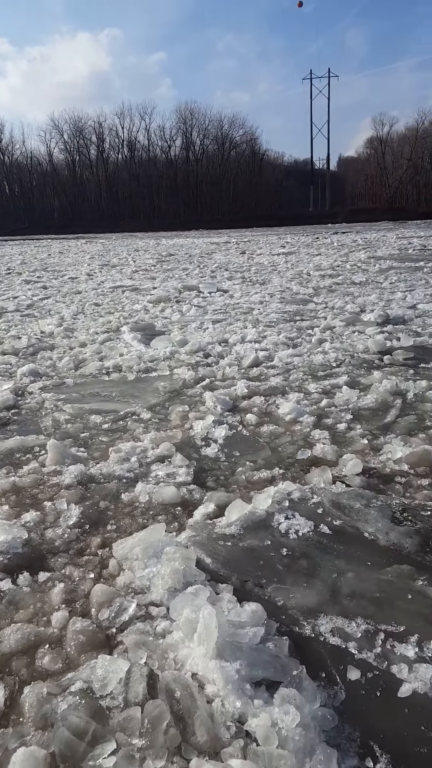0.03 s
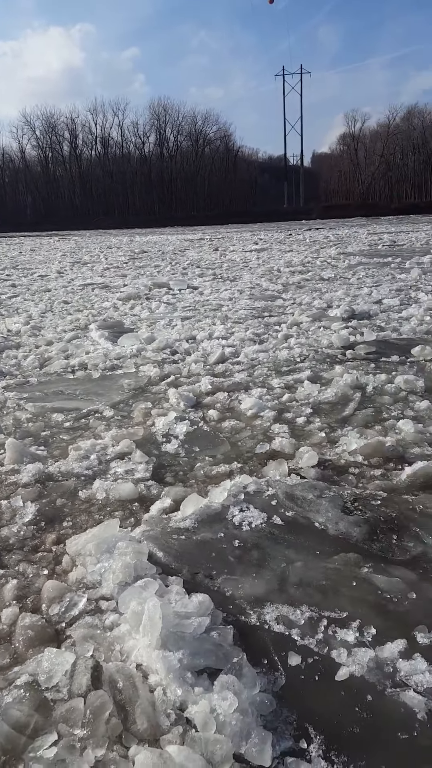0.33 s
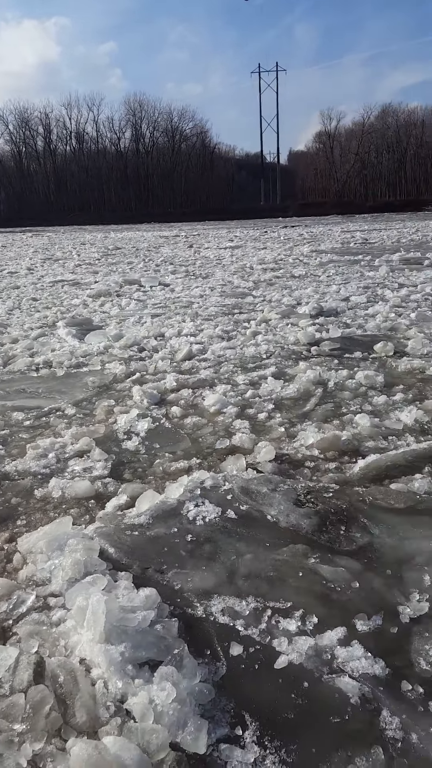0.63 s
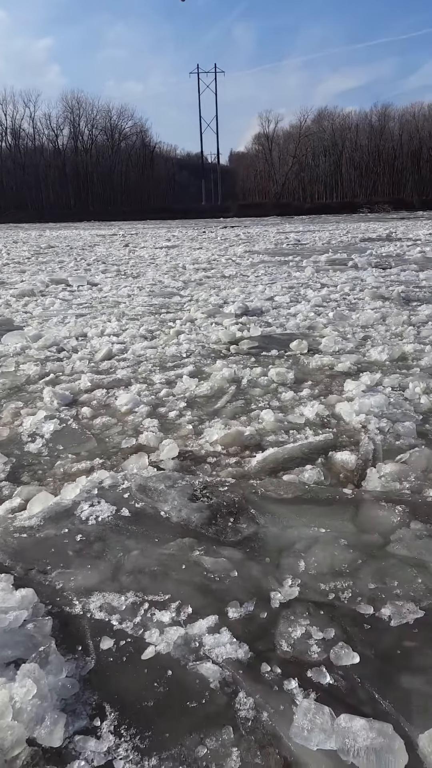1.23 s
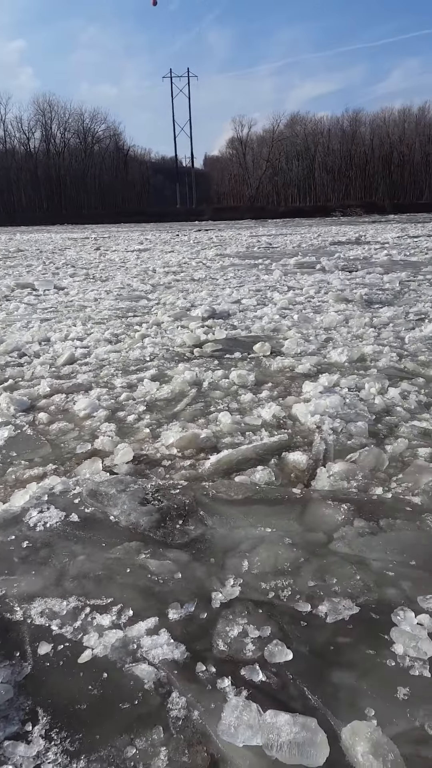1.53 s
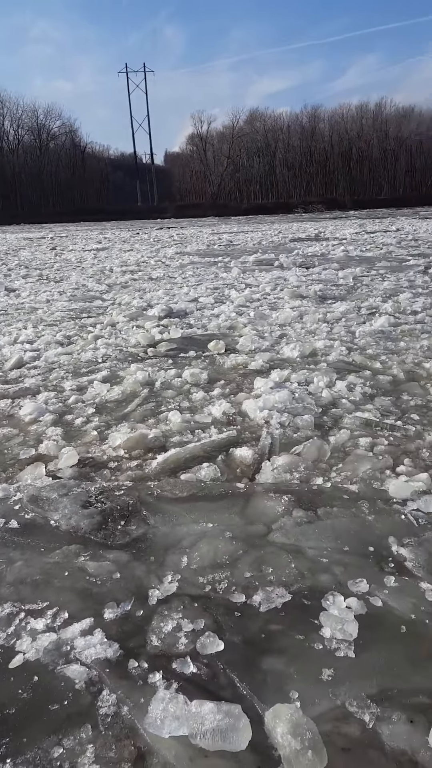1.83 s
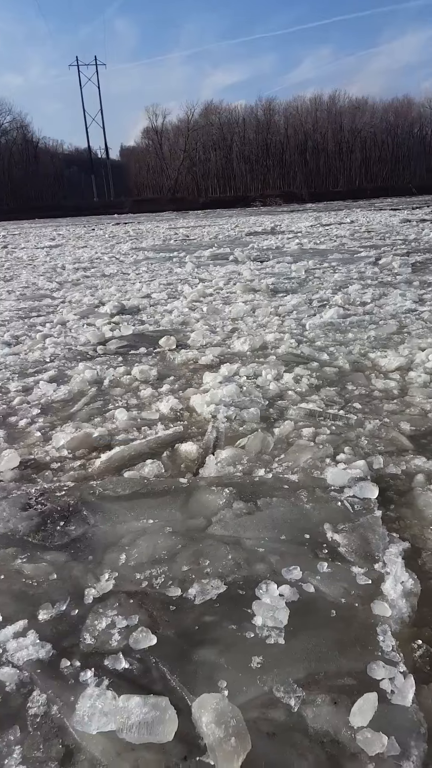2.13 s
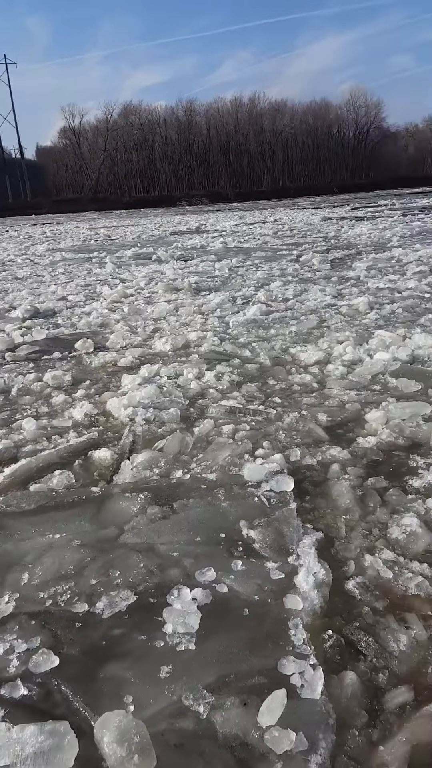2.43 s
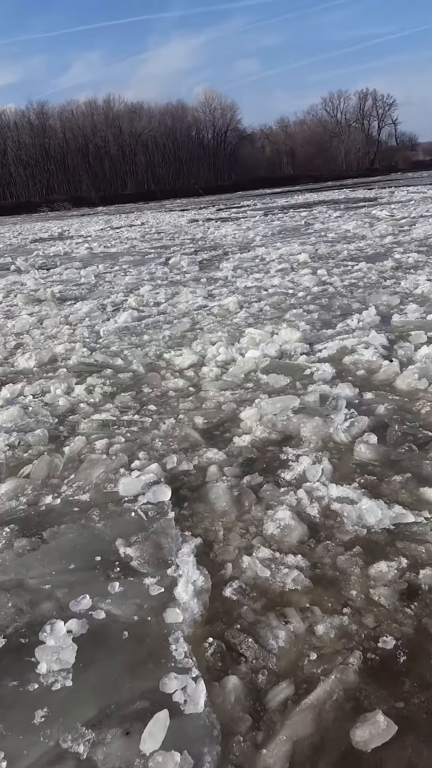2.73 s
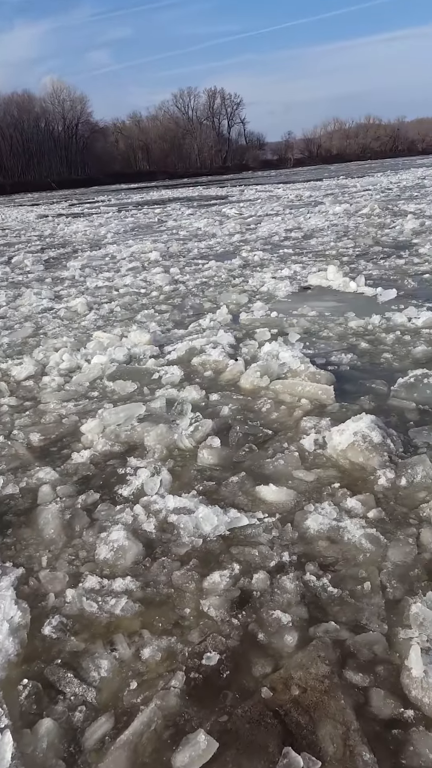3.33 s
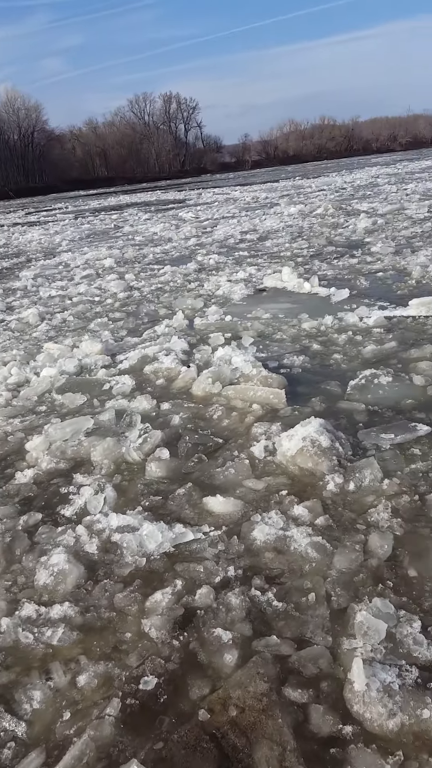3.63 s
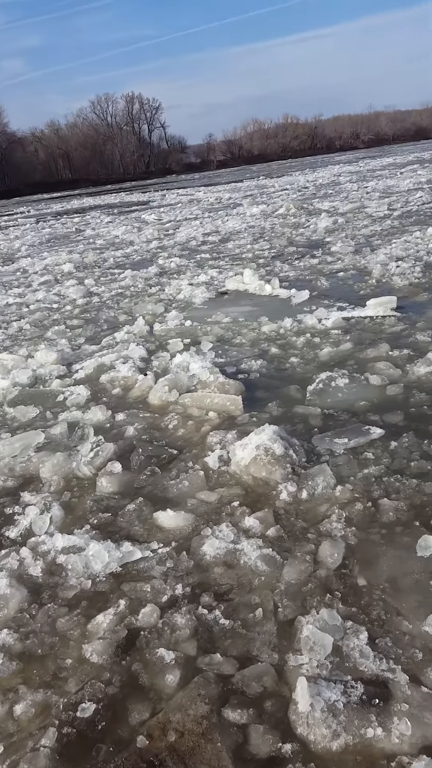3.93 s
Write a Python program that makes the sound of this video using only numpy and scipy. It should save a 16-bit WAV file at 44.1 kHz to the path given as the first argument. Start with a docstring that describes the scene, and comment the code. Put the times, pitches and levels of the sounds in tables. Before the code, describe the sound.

Steady low rumble of a distant engine, with faint river slush hissing and crackling.

```python
"""A large engine runs steadily some way off, beside a river full of drifting ice.
Its shaft harmonics and a few whines waver over a throbbing exhaust roar, and its casing rings.
On the river, slush hisses, tiny crystals crackle and pieces of ice tick together now and then.
The listener turns to the right in the second half, which shifts the colour of the sound."""
import sys
import numpy as np
from scipy import signal
from scipy.fft import rfft, irfft
from scipy.io import wavfile
from scipy.ndimage import map_coordinates

SR = 44100
rng = np.random.default_rng(int(sys.argv[2]) if len(sys.argv) > 2 else 0)


def transcribe(signal):
    """Save signal, clipped to [-1, 1], as a 16-bit WAV file at the path in sys.argv[1]."""
    frames = np.atleast_2d(signal).T
    limited = np.clip(frames, -1, 1)
    pcm = np.round(limited * 32767).astype(np.int16)
    wavfile.write(sys.argv[1], SR, pcm)


N = 176400

# Engine speed. Each row: time in seconds, firings per second.
FIRING_RATE = [(0, 93.02), (.6, 92.8), (1.4, 92.43), (2.1, 92.62), (2.7, 92.5), (3.1, 92.12), (3.6, 92.99),
               (4, 92.85)]
# Shaft tones. Each row: multiple of the firing rate, relative level in dB.
HARMONICS = [(2, -32), (5, -35.5), (7, -40), (9, -42), (11, -44), (12, -38.5), (13, -45.5), (14, -38),
             (15, -39), (16, -41.5), (18, -44.5), (24, -50.5)]
# Other spinning parts, plus a side tone at 758 Hz just above the eighth harmonic. Each row: pitch in Hz,
# relative level in dB.
WHINES = [(79, -29.5), (227.5, -32), (301.5, -30), (487, -33), (569, -29.5), (658, -30), (758, -30),
          (896, -35), (1793, -41), (2686, -46)]
# Rise and fall of both sets of tones. Each row: time in seconds, gain in dB.
TONE_GAIN = [(0, 1), (1.7, -0.5), (2.6, 0), (3.15, 0), (3.6, 0), (4, 2)]
# The leading tones. Each row: time in seconds, then relative dB of harmonics 1, 4, 6 and 8.
DRONE_LEVELS = [(0, -26, -26, -23.5, -23), (.4, -25, -24, -26.5, -20.5), (.9, -24.5, -24.5, -23, -22),
                (1.15, -23, -30, -34, -22.5), (1.48, -25, -34.5, -34, -22.5),
                (1.72, -28.5, -30.5, -24, -20.5), (2.12, -26, -27, -31.5, -22),
                (2.28, -28, -25.5, -23, -22), (2.48, -40, -31, -22.5, -21), (2.72, -30, -32, -36.5, -21),
                (2.87, -35, -26, -39, -29), (3.08, -37, -30, -31.5, -34.5), (3.28, -36, -32.5, -27, -37.5),
                (3.42, -40, -28, -27, -25), (3.7, -30, -26, -42, -28), (4, -40, -26, -38, -28)]
# Brief tones. Each row: peak time and half-width in seconds, pitch in Hz, relative level in dB.
SWELLS = [(.45, 0.055, 172, -23), (.76, 0.088, 172, -22), (1.52, 0.28, 1810, -33), (1.6, 0.15, 1112, -31),
          (1.78, .16, 1900, -38), (2.0, 0.069, 115.5, -22), (2.32, .08, 121.9, -21),
          (2.43, 0.056, 172.2, -27), (3.28, .09, 172, -24)]
# The casing's ring. Each row: time in seconds, relative level in dB.
RING_LEVEL = [(0, -35.5), (1.0, -41), (1.45, -36.5), (1.75, -36.5), (2.2, -38.5), (3.1, -47), (4, -39.5)]
# Colours of the noises. Each row: frequency in Hz, relative level in dB.
ROAR_COLOUR = [(20, -32), (33, -18.5), (46, -8.5), (65, -7), (85, -6.5), (125, -2.5), (178, -0.7),
               (212, -7), (400, -4.5), (440, -8), (570, -4.5), (620, -8), (790, -10.5), (910, -8.5),
               (980, -13.5), (1200, -17.5), (1600, -19.5), (1850, -18), (2050, -38), (3000, -46.5),
               (6000, -79)]
SLUSH_COLOUR = [(500, -31.5), (2100, -26), (2700, -30), (3100, -34.5), (3800, -36.5), (5000, -46.5),
                (7000, -58), (9500, -77.5), (11500, -68), (15500, -70)]
CRACKLE_COLOUR = [(1000, -5.5), (2500, -1), (5000, -0.5), (8000, -19.5), (10000, -30.5), (15000, -18.5)]
# Ice pieces touching. Each row: start in seconds, relative level in dB.
TICKS = [(2.385, -31), (2.840, -38), (3.048, -32)]
# Five bands, low to high, as the listener turns. Each row: time in seconds, gain in dB.
BASS_GAIN = [(0, 0), (1.3, 0.5), (2.3, 2.3), (2.47, -4), (2.62, 1), (2.9, 2.5), (3.05, -7), (3.25, -12.5),
             (3.45, 1.5), (3.7, 4), (4, 2.5)]
LOW_MIDDLE_GAIN = [(0, -1), (1.2, 0), (2.2, -.5), (2.45, -0.5), (2.7, 0), (2.95, -2), (3.13, 2.2),
                   (3.3, -0.5), (4, 1)]
MIDDLE_GAIN = [(0, -1.5), (2.2, -1.5), (2.5, -2.5), (2.75, -0.5), (3.1, 0), (3.45, -2), (3.7, -7),
               (4, -7.5)]
HIGH_MIDDLE_GAIN = [(0, -0.5), (2.4, -0.5), (2.75, -1.4), (3.1, 0), (3.4, -2.5), (4, -0.5)]
TREBLE_GAIN = [(0, -0.64), (1.0, -0.75), (2.3, -0.066), (2.7, 0.69), (3.1, 1.7), (3.5, 0.43), (4, .3)]
# How alike the two ears sound. Each row: frequency in Hz, likeness from 0 to 1.
EAR_LIKENESS = [(60, 0.95), (180, 1), (300, 0.98), (520, 0.89), (890, 0.67), (1500, 0.05), (2600, 0.08),
                (8000, 0.2)]
# Lean to the left by pitch. Each row: frequency in Hz, left minus right in dB.
BALANCE = [(60, 1.5), (320, 2.5), (490, 1.1), (740, 2), (1130, -0.6), (1750, -1.5), (2200, 0.5), (4000, 4),
           (8000, 8.5), (12000, -1.5)]
# Added lean over time. Each row: time in seconds, left minus right in dB.
PAN = [(0, 1), (2.3, 0.5), (2.7, -0.5), (3.15, -1.5), (3.55, 0.1), (4, 1)]
# Delay between the ears. Each row: time in seconds, the left ear's lead in milliseconds.
LEFT_LEAD = [(0, 0.2), (1.7, 0.16), (2.4, 0.14), (3.1, 0.11), (4, 0.23)]

TONE_DB, WAVER_DB, SCATTER_HZ, SPEED_JITTER = -0.5, 1.85, 8.1, 0.00067
ROAR_DB, ROAR_FLICKER_DB, THROB_DEPTH = -15.5, 0.7, 0.12
RING_HZ, RING_WIDTH_HZ, RASP_DEPTH = 1813, 190, 0.61
SLUSH_DB, SLUSH_FLICKER_DB, TICK_DECAY_S = -32, 0.73, .0005
CRACKLES_PER_S, CRACKLE_SPREAD_DB, CRACKLE_DB = 470, 2.5, -55.5


def engine_tones(phase, firing_hz):
    """Shaft harmonics and whines follow the engine's speed, each wavering in loudness."""
    partials = list(HARMONICS) + [(hz / firing_hz, db) for hz, db in WHINES]
    tones = sum(gain(db + WAVER_DB * wander(0.5)) * tone(multiple * phase, multiple * firing_hz)
                for multiple, db in partials)
    return ear_delay(tones) * gain(TONE_DB + over_time(TONE_GAIN))


def exhaust(phase):
    """The exhaust roars, throbbing at twice the firing rate."""
    throb = 1 + THROB_DEPTH * np.cos(2 * phase)
    return outdoor_noise(ROAR_COLOUR) * throb * gain(ROAR_DB + ROAR_FLICKER_DB * wander(15))


def drone(phase, firing_hz):
    """Four leading harmonics sing out clearly, then fade as the listener turns away."""
    sound = 0
    for column, multiple in enumerate((1, 4, 6, 8), start=1):
        level = gain(over_time(np.array(DRONE_LEVELS)[:, [0, column]]))
        sound += level * tone(multiple * phase, multiple * firing_hz, scatter=.22)
    return ear_delay(sound)


def swells(phase, firing_hz):
    """Low booms and narrow rings rise and sink, their pitch following the engine's speed."""
    t = np.arange(N) / SR
    sound = 0
    for peak_s, half_width_s, hz, db in SWELLS:
        level = gain(db) * np.exp(-((t - peak_s) / half_width_s) ** 2)
        sound += level * tone(phase * hz / firing_hz, hz)
    return ear_delay(sound)


def casing(phase):
    """The engine casing rings around one pitch and rasps as each firing shakes it."""
    resonance = 1 / (1 + (2 * (frequencies() - RING_HZ) / RING_WIDTH_HZ) ** 2)
    ring = unit_rms(filtered(rng.standard_normal((2, N)), resonance))
    return ring * (1 + RASP_DEPTH * np.cos(phase)) * gain(over_time(RING_LEVEL))


def slush():
    """Drifting slush hisses with a slight flicker."""
    return outdoor_noise(SLUSH_COLOUR) * gain(SLUSH_DB + SLUSH_FLICKER_DB * wander(16))


def crackle():
    """Tiny ice crystals click at random times and strengths."""
    clicks = (rng.random((2, N)) < CRACKLES_PER_S / SR) * rng.choice([-1, 1], (2, N))
    strength = gain(CRACKLE_SPREAD_DB * np.minimum(rng.exponential(size=(2, N)), 5))
    return gain(CRACKLE_DB) * unit_rms(filtered(clicks * strength, gain(over_pitch(CRACKLE_COLOUR))))


def ice_ticks():
    """Pieces of ice knock together, each giving a very short burst of noise."""
    bursts = np.zeros((2, N))
    for start, db in TICKS:
        age = np.arange(N) / SR - start
        decay = (age >= 0) * np.exp(-np.abs(age) / TICK_DECAY_S)
        bursts += gain(db) * decay * rng.standard_normal((2, N))
    return filtered(bursts, unit_rms(gain(over_pitch(CRACKLE_COLOUR))))


def turning(x):
    """Bass, middle and treble rise and fall as the listener turns."""
    f = frequencies()
    around = lambda hz, octaves: np.exp(-.5 * (np.log2(f / hz) / octaves) ** 2)
    below = lambda hz: 1 / (1 + (f / hz) ** 6)
    bands = [(BASS_GAIN, below(hz=120)),
             (LOW_MIDDLE_GAIN, around(hz=340, octaves=0.32)),
             (MIDDLE_GAIN, around(hz=553, octaves=0.23)),
             (HIGH_MIDDLE_GAIN, around(hz=885, octaves=0.42)),
             (TREBLE_GAIN, 1 - below(hz=770))]
    return x + sum((gain(over_time(rows)) - 1) * filtered(x, band) for rows, band in bands)


def ear_delay(x):
    """Sound that arrives from the left reaches the left ear first."""
    shift = over_time(LEFT_LEAD) * SR / 2000  # half the delay for each ear, in samples
    return np.array([map_coordinates(ear, [np.arange(N) + side * shift], order=5, mode="mirror")
                     for ear, side in zip(np.broadcast_to(x, (2, N)), (1, -1))])


def tone(phase, hz, scatter=0.36):
    """One tone with a restless scattered part, less alike in the two ears at high pitch."""
    alike = np.interp(hz, *np.array(EAR_LIKENESS).T)
    drift = lambda: (wander(SCATTER_HZ) + 1j * wander(SCATTER_HZ)) / np.sqrt(2)
    scattered = np.sqrt(alike) * drift() + np.sqrt(1 - alike) * np.array([drift(), drift()])
    steady = np.exp(1j * (phase + rng.uniform(0, 2 * np.pi)))
    return np.sqrt(2) * np.real(unit_rms(1 + scatter * scattered) * steady)


def outdoor_noise(colour_rows):
    """Noise in the open air: one part shared by both ears and a separate part for each."""
    alike = np.clip(over_pitch(EAR_LIKENESS), 0, .999)
    colour = gain(over_pitch(colour_rows))
    shared = filtered(rng.standard_normal(N), colour * np.sqrt(alike))
    separate = filtered(rng.standard_normal((2, N)), colour * np.sqrt(1 - alike))
    return unit_rms(ear_delay(shared) + separate)


def wander(rate_hz):
    """Smooth random wandering with a typical size of 1."""
    return unit_rms(filtered(rng.standard_normal(N), np.exp(-.5 * (frequencies() / rate_hz) ** 2)))


def gain(db):
    """Turn decibels into a multiplier."""
    return 10 ** (np.asarray(db) / 20)


def unit_rms(x):
    """Scale to an average power of 1."""
    return x / np.sqrt(np.mean(np.abs(x) ** 2))


def over_time(rows):
    """Join (seconds, value) points by straight lines."""
    return np.interp(np.arange(N) / SR, *np.array(rows, float).T)


def over_pitch(rows):
    """Join (Hz, value) points, giving every octave equal room."""
    hz, value = np.array(rows, float).T
    return np.interp(np.log(frequencies()), np.log(hz), value)


def frequencies():
    """The frequencies of the spectrum, at least 1 Hz."""
    return np.maximum(np.arange(N // 2 + 1) * SR / N, 1)


def filtered(x, gains):
    """Turn each frequency up or down by its own gain."""
    return irfft(rfft(x) * gains, N)


def scene():
    """Engine and river ice, heard from the bank and leaning mostly to the left."""
    speed = over_time(FIRING_RATE) * (1 + SPEED_JITTER * wander(3.2))
    phase = 2 * np.pi * np.cumsum(speed) / SR  # one cycle per firing
    firing_hz = speed.mean()
    engine = engine_tones(phase, firing_hz) + exhaust(phase)
    ice = slush() + crackle() + ice_ticks()
    sound = turning(engine + ice) + drone(phase, firing_hz) + swells(phase, firing_hz) + casing(phase)
    sides = np.array([[.5], [-.5]])  # each ear takes half of the lean
    return filtered(sound, gain(sides * over_pitch(BALANCE))) * gain(sides * over_time(PAN))


def record(dry, low_cut_hz=28, ceiling=.92, high_cut_hz=15700):
    """The recorder cuts the deepest rumble, rounds the highest peaks and cuts the top treble."""
    trimmed = filtered(dry, 1 / np.sqrt(1 + (low_cut_hz / frequencies()) ** 8))
    rounded = trimmed / (1 + (trimmed / ceiling) ** 8) ** (1 / 8)
    return signal.sosfilt(signal.ellip(8, .2, 70, high_cut_hz, fs=SR, output="sos"), rounded)


dry = scene()
out = record(dry)
transcribe(out)
```